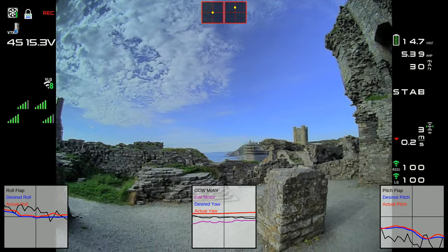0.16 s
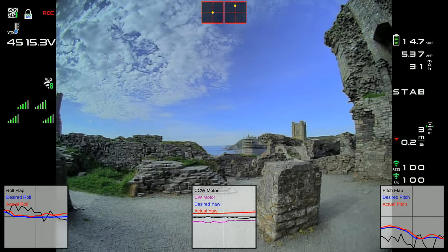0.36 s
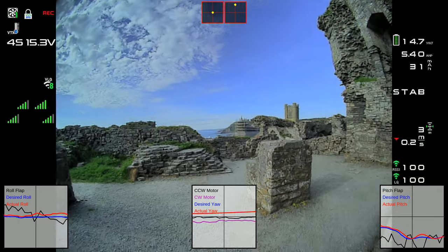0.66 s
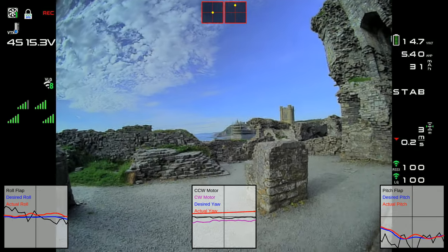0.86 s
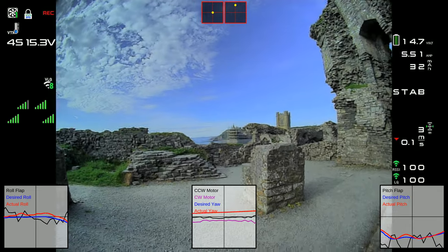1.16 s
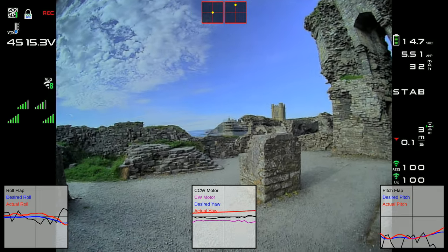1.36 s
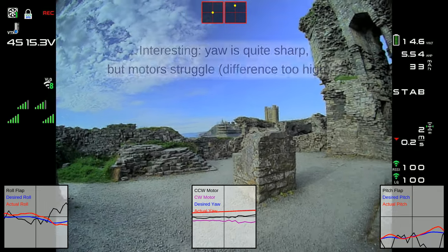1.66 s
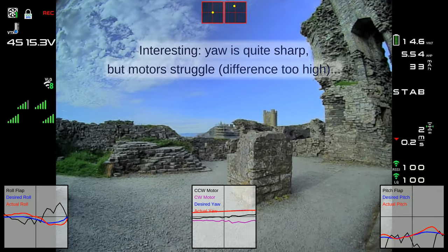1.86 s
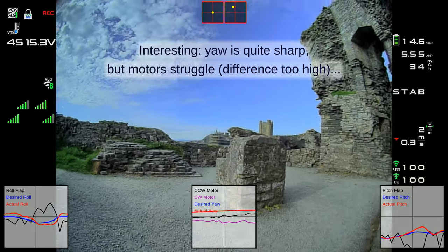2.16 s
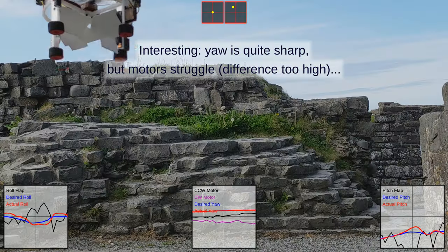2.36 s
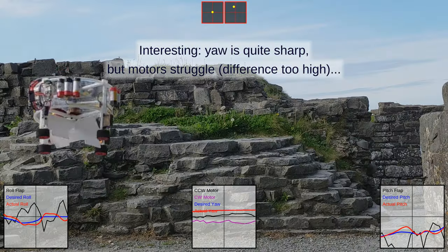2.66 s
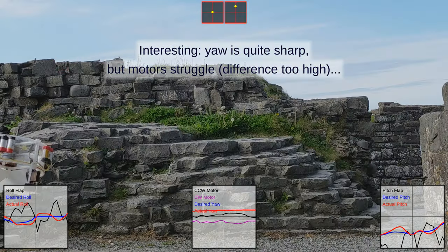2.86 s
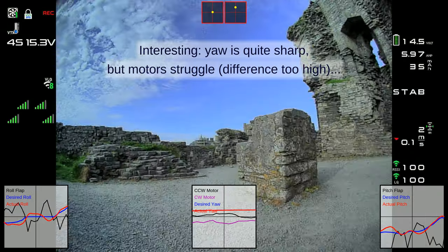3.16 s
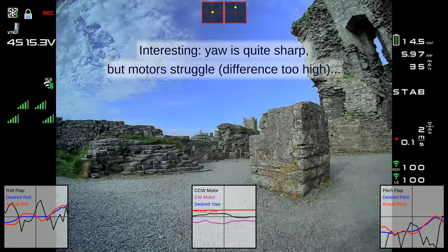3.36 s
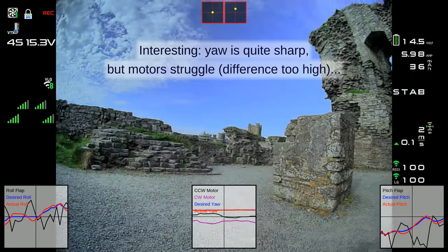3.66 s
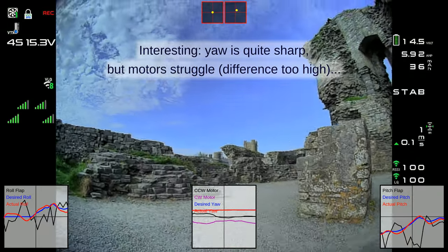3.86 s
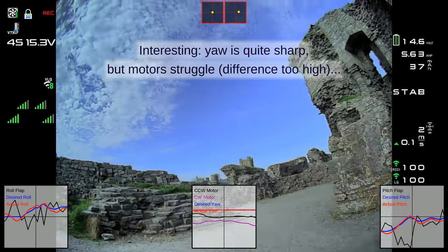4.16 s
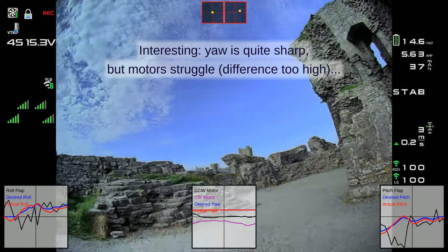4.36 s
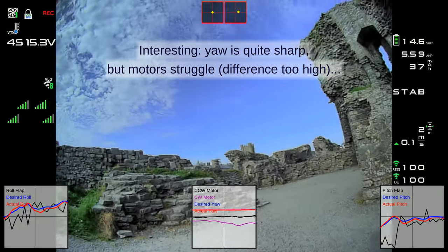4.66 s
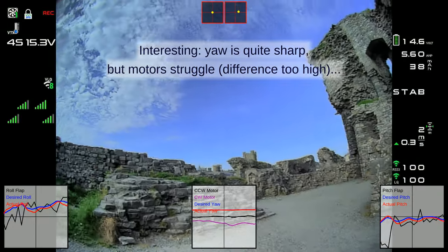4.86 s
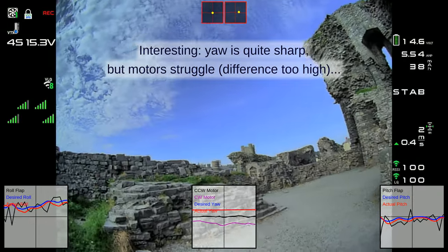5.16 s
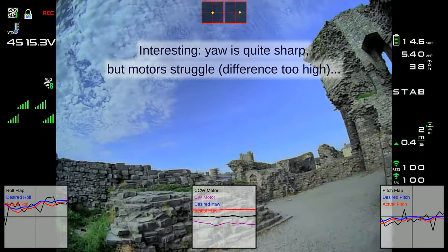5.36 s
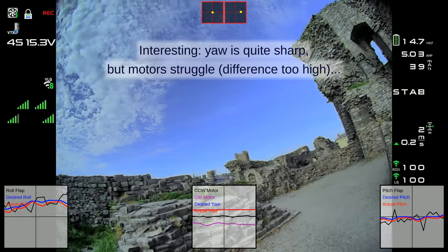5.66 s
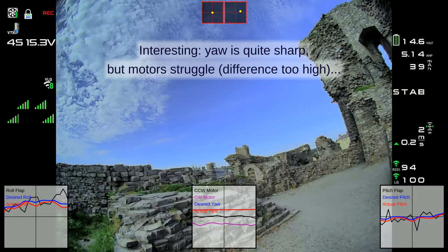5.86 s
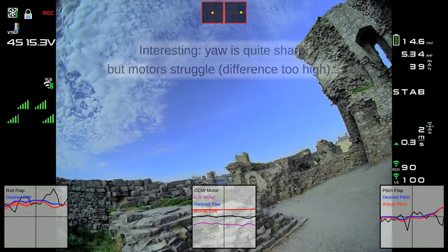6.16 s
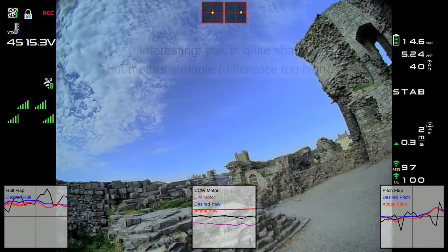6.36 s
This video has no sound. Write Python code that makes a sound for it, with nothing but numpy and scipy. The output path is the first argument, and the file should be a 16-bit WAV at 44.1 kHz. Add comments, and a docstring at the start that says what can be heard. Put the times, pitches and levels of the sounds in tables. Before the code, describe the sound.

From 0 s a small electric copter is already hovering close by in the open among stone walls. Two counter-turning rotors give a dense, rough, buzzing whine, mid-pitched with strong higher tones, fluttering and beating as their slightly different speeds drift. Bright blade hiss rides above, subtly hollow from a short stone echo. Low, soft wind puffs bump the mono microphone during the first second. From 0.6 to 2 s a higher motor whine stands out. At about 2 to 3 s broad downwash rushes in and the buzz turns harsher, the pitch edging up near 3 s. From 3 s it weakens; by 4 s the craft is distant, a thin wavering buzz and faint hiss. Around 5.3 s the pitch dips briefly, then recovers and sags slightly. Very faint wind puffs return past 5 s, over a barely audible far rumble, the rotors still running at 6.5 s.

```python
"""Close by among stone ruins a small copter hovers, its two stacked, counter-turning two-blade rotors singing.
Each rotor sounds at its blade rate; lower blades cutting the upper wake sound at sums of both rates.
Blade tips hiss, with a varying echo off a stone face; the downwash is loudest from about 2 to 3 s, then weakens.
By about 4 s the craft has drifted off and is faint. Wind rumbles in puffs, mostly in the first second
and again past 5 s, over a faint distant rumble, all on one mono microphone."""
import sys
import numpy as np
from scipy import signal
from scipy.fft import rfft, irfft, next_fast_len
from scipy.io import wavfile
from scipy.ndimage import uniform_filter1d, map_coordinates

SR = 44100
rng = np.random.default_rng(int(sys.argv[2]) if len(sys.argv) > 2 else 0)


def wav_out(sig):
    """Save sig, one row per channel (or a flat mono array), as 16-bit PCM at SR to the path in sys.argv[1]."""
    wavfile.write(sys.argv[1], SR, np.round(np.clip(np.atleast_2d(sig).T, -1, 1) * 32767).astype(np.int16))


N = 287532

# throttle, the mean blade-passing rate of both rotors: [t/s, f/Hz]
THROTTLE = [(0.0, 482), (0.24, 482), (0.48, 480), (0.84, 489.3), (1.2, 482), (1.61, 491.6), (2.67, 485.9),
            (2.91, 498.5), (3.01, 502), (3.09, 500), (3.23, 491.7), (3.73, 490), (4.02, 480.2), (4.67, 490),
            (4.96, 478.7), (5.18, 475.7), (5.29, 460), (5.35, 460.4), (5.44, 462), (5.61, 478.5),
            (5.76, 485), (5.88, 480.4), (6.11, 470.5), (6.51, 472.3)]
# yaw command, which speeds one rotor up and slows the other by as much: [t/s, f/Hz]
YAW = [(0.0, 48), (0.08, 47.7), (0.19, 32.6), (0.24, 33), (0.35, 32.6), (0.56, 42.5), (0.61, 39.7),
       (0.7, 23.9), (0.76, 22), (0.93, 32.7), (1.06, 20.7), (1.29, 21.2), (1.42, 27.2), (1.52, 23.1),
       (1.63, 28), (1.71, 25.3), (1.84, 40), (2.0, 20.3), (2.09, 33.7), (2.2, 26), (2.28, 48.5), (2.33, 52),
       (2.41, 53), (2.54, 43), (2.65, 52.1), (2.77, 53.6), (2.86, 45.0), (3.03, 43.5), (3.11, 58),
       (3.18, 61), (3.52, 72.5), (3.64, 65.9), (3.86, 32.3), (4.26, 23.6), (4.46, 38), (4.57, 32),
       (4.93, 52.3), (5.09, 47.6), (5.26, 64.5), (5.59, 49.5), (5.74, 46.5), (5.92, 60), (6.06, 55),
       (6.14, 48.6), (6.29, 58.0), (6.51, 63)]
# tone groups at the microphone as the craft tilts and turns, before beaming: [t/s, thrust hum/dB, its octave/dB,
# wake cutting/dB, slow rotor and high mixed tones/dB, motor whine/dB, blade buzz/dB]
GROUP_LEVELS = [(0.0, -35, -30, -22.5, -22, -38, -34), (0.12, -39.5, -32, -21.5, -22.5, -34.5, -30.0),
                (0.28, -45, -29, -22.5, -28, -31, -37.5), (0.45, -39.5, -32, -23, -24.5, -30.0, -29.5),
                (0.62, -48, -32.5, -24.5, -27.5, -22, -27), (0.95, -36, -30, -25.5, -29.5, -26.0, -32.5),
                (1.42, -34.5, -29.5, -27.5, -26.5, -24.0, -29.5),
                (1.95, -37, -24.5, -26, -26.5, -22, -29.5), (2.26, -45, -27, -25.5, -27.5, -32.5, -25.5),
                (2.46, -40, -36, -38, -25.5, -35, -23.5), (2.62, -42, -28, -26.5, -22.0, -35, -25),
                (2.8, -39.5, -21, -23.5, -24, -35.5, -23), (2.95, -45, -32, -25, -30, -38, -23),
                (3.1, -39.5, -39, -35.5, -29.5, -37, -31.5), (3.28, -43.5, -33, -38, -32, -32.5, -33.5),
                (3.56, -35, -33.5, -33.5, -29.5, -41, -33), (3.8, -47.0, -32, -35.5, -34, -40, -37.5),
                (4.1, -48, -49.5, -50, -39, -42.5, -41.5), (4.55, -45.5, -56.0, -51, -43, -39, -40),
                (4.74, -45.0, -40.5, -50, -41.0, -43, -42.5), (5.0, -47.5, -40, -50.5, -38.5, -47.0, -40),
                (5.36, -44.0, -45, -56.0, -40, -41.5, -41.5), (5.7, -44.5, -36.5, -51.5, -41.5, -37.5, -37),
                (6.1, -50.0, -43.0, -59, -40.0, -36, -40), (6.3, -54, -38.5, -53.5, -44, -43, -41.5),
                (6.52, -43.5, -34.0, -54.5, -39.5, -38, -39.5)]
# tones of each group: [multiple of fast blade rate, multiple of slow blade rate];
# a two-blade shaft turns at half its blade rate
HUM = [(.5, 0), (1, 0)]
OCTAVE = [(2, 0)]
WAKE = [(1, 1), (1, 3)]
SLOW_ROTOR = [(0, 1), (0, 2), (0, 3), (0, 4), (0, 5), (2, 2), (2, 3), (3, 3), (3, 4), (4, 3), (5, 4)]
WHINE = [(7, 0), (14, 0)]
BUZZ = [(3, 0), (4, 0), (5, 0), (6, 0)]
SIZZLE = [(k, 0) for k in (8, 9, 10, 11, 12, 13, 15, 16, 17, 18, 19, 20)]
# how each of those tones beams, one row a tone: [level/dB towards side 0, 1, 2, 3, 4]
HUM_BEAM = [(-20, -29, -29.5, -27, -22.5), (-0.5, -2, -1, 1.5, -1)]
OCTAVE_BEAM = [(0, 0, 0, 0, 0)]
WAKE_BEAM = [(-1, -0.0, -2.5, 0.5, -1), (-18, -12, -19, -10, -4.5)]
SLOW_ROTOR_BEAM = [(-22, -19, -16.5, -30, -22.5), (-6.0, -8.5, -14, -9.5, -10.0),
                   (-9.0, -13, -4.5, -9.5, -14.5), (-15.0, -7.5, -14, -4.5, -23),
                   (-12, -14, -13, -17, -18.5), (-7, -14.5, -7, -13, -6.5), (-15, -19, -14.5, -13.0, 0),
                   (-9.5, -13, 0, -11.5, -21), (-24, -8, -24, -15, 2), (-18, -12, -11, -31, 4),
                   (-17, -6.5, -24, -7, -4)]
WHINE_BEAM = [(0, 0, 1.5, 1, -1), (-12, -6, -5, -12, -13)]
BUZZ_BEAM = [(-15, -12.5, -19, -7.5, -33.5), (-2, -11, -7, -5, -18), (-16.0, -10.5, -15.5, -4.5, -0.5),
             (-2.5, -7, -3.5, -5, -5.0)]
SIZZLE_BEAM = [(-6, -19, -9, -15, -3), (-5.5, -12.5, -18, -4.5, -11), (-9.5, -7, -4.5, -8.5, -3),
               (-5.5, -13.5, -9, -10, -15.5), (-8, -5, -11.5, -6, -8.5), (-8, -6, -2.5, -6, -4.5),
               (-25, -17, -13, -9, -22.5), (-22, -14.0, -11, -9, -19.5), (-20, -19.0, -17, -18, -19),
               (-19.0, -11, -27.0, -19.0, -22), (-15, -18, -19, -25.0, -16),
               (-15, -21.0, -27.0, -19.0, -22.0)]
# side of the craft facing the microphone: [t/s, side 0-4]
SIDE_SHOWN = [(.5, 0), (.85, 1.5), (2.05, 1), (2.3, 1.5), (2.9, 3), (3.15, 3), (3.7, 2.5), (4.0, 3.5)]
# the craft is close, then leaves: [t/s, level/dB of the tip hiss in its top band, above 8 kHz]
HISS_LEVEL = [(0, -22.5), (.25, -24), (.45, -22.5), (1.9, -23.5), (2.05, -23), (2.7, -22), (3.0, -26),
              (3.7, -27), (4.0, -32.5), (4.7, -33.5), (5.1, -34.5), (5.45, -36.5), (5.7, -35), (6.52, -36)]
# tip hiss spectrum: [f/Hz, relative level per Hz/dB]
HISS_SPECTRUM = [(900, -46), (1500, -22.5), (2000, -6), (3300, -0.5), (5000, -2), (6900, -0.5),
                 (8000, -2.5), (9300, -1.5), (10400, -6), (11300, -4.5), (11950, -0.5), (12600, -2.5),
                 (14000, -3.5), (15800, -4)]
# echo off the stone: [t/s, extra path/ms, strength 0-1]
STONE = [(0, .32, .15), (.35, .28, 0), (.5, .23, .5), (.8, .27, 0.59), (1.2, .3, .4), (1.7, 0.3, 0.4),
         (2.0, .27, 0.38), (2.2, .15, 0.24), (6.52, 0.16, 0.22)]
# downwash, its level over time: [t/s, level/dB]
WASH_LEVEL = [(0, -35), (.6, -40.5), (.85, -44), (1.9, -46.5), (2.1, -34), (2.5, -32.5), (3.5, -43.5),
              (3.9, -48.5), (4.6, -52.5), (5.8, -54.5), (6.52, -57)]
# downwash spectrum: [f/Hz, relative level per Hz/dB]
WASH_SPECTRUM = [(150, -22.5), (300, -3), (420, -1.5), (570, -7), (640, -4.5), (740, 2), (950, 5.5),
                 (1200, 8), (1400, 7.5), (1650, 1), (2000, 4.5), (4000, -4.5), (8000, -50)]
# puffs of wind on the microphone: [centre t/s, half width/s, peak level/dB]
PUFFS = [(.1, 0.2, -43.5), (.55, 0.16, -47), (.83, 0.056, -49), (1.36, .07, -59), (1.62, .05, -66),
         (2.62, .05, -69), (5.2, 0.13, -65), (5.78, 0.055, -58), (6.0, 0.22, -61), (6.45, 0.098, -62)]
# wind spectrum: [f/Hz, relative level per Hz/dB]
WIND_SPECTRUM = [(20, -23), (45, -13), (80, 2), (130, -7), (250, -8.5), (500, -47)]
# distant rumble spectrum: [f/Hz, relative level per Hz/dB]
DISTANT_SPECTRUM = [(20, -25), (60, -12), (150, 1.5), (300, 6.5), (500, -10), (1000, -30)]

STEP = 32  # samples between values of slow random curves
CURL = .925  # phase lag of a tone per squared order gap, radians
HUNT_HZ = 0.7064  # each speed controller hunts about its set rate by roughly this much
SIZZLE_OVER_HISS_DB, SIZZLE_LOSS = -10.5, 0.77  # sizzle dB = this + loss x hiss level dB
CALM_DB = -75.5  # wind between puffs
TOP_HZ = 15740  # recorder's band limit


def rotor_tones(fast, slow):
    """Blade loading and wake cutting sound at whole and half multiples of the blade rates and their sums."""
    hum, octave, wake, lower, whine, buzz = curves(GROUP_LEVELS)
    sizzle = SIZZLE_OVER_HISS_DB + SIZZLE_LOSS * curves(HISS_LEVEL)[0]
    # level/dB, tones, beams, fade/dB, roughness, blur/knots per s
    groups = [
        (hum, HUM, HUM_BEAM, 1.66, 0.26, 88.9),
        (octave, OCTAVE, OCTAVE_BEAM, 0.7, 0.19, 70.9),
        (wake, WAKE, WAKE_BEAM, 1.0, 0.09, 70),
        (lower, SLOW_ROTOR, SLOW_ROTOR_BEAM, 2.3, 0.28, 90.13),
        (whine, WHINE, WHINE_BEAM, 1.3, 0.16, 199.0),
        (buzz, BUZZ, BUZZ_BEAM, 3.0, 0.38, 179.4),
        (sizzle, SIZZLE, SIZZLE_BEAM, 3.5, 0.65, 259.2),
    ]
    tones = np.zeros(N)
    for level_db, orders, beams, fade_db, rough, blur_rate in groups:
        tones += amp(level_db) * voice(orders, beams, fast, slow, fade_db, rough, blur_rate)
    return tones


def voice(orders, beams, fast, slow, fade_db, rough, blur_rate):
    """Each tone beams and fades its own way; gusty inflow shakes size and phase, blurring its edges."""
    out = np.zeros(N)
    coarse_times = np.minimum(np.arange(0, N + STEP, STEP), N - 1)
    side = curves(SIDE_SHOWN)[0][coarse_times]
    for (m, n), beam_db in zip(orders, beams):
        inflow = 1 + rough * (wobble(blur_rate) + 1j * wobble(blur_rate))
        towards_mic_db = np.interp(side, np.arange(len(beam_db)), beam_db)
        fading_db = fade_db * (1 - wobble(9) ** 2)
        size = amp(towards_mic_db + fading_db) * inflow
        # tones are locked to the blade angles, so neighbours beat deeply; CURL spreads each blade pass in time
        phase = m * fast + n * slow + CURL * (m - n) ** 2
        out += np.sqrt(2) * (fine(size) * np.exp(1j * phase)).imag
    return out


def turns(rate):
    """Blade phase in radians; the rotor's inertia smooths the commanded rate."""
    smooth_rate = uniform_filter1d(rate, size=2000)
    return 2 * np.pi * np.cumsum(smooth_rate + HUNT_HZ * fine(wobble(14))) / SR


def tip_hiss(fast, slow):
    """Turbulence at the blade tips hisses, swelling as each blade sweeps past."""
    sweep = 1 + 0.065 * np.cos(fast) + 0.046 * np.cos(slow)
    # the whole hiss lies 4 dB over its top band
    level_db = curves(HISS_LEVEL)[0] + 4.0 + 0.15 * fine(wobble(11))
    return amp(level_db) * unit(sweep * rush(HISS_SPECTRUM, patchy_db=1.63))


def stone(x, dull_hz):
    """x and its short echo, which combs the spectrum; rough stone scatters the treble away."""
    delay_ms, strength = curves(STONE)
    dull = filtered(x, lambda hz: 1 / (1 + (hz / dull_hz) ** 6))
    echo = map_coordinates(dull, [np.arange(N) - delay_ms * SR / 1000], mode="nearest")
    return x + strength * echo


def downwash():
    """Air driven down by the rotors roars softly and unevenly."""
    return amp(curves(WASH_LEVEL)[0]) * rush(WASH_SPECTRUM, patchy_db=2.5)


def wind():
    """Air pressing on the microphone rumbles in lumps, low in frequency."""
    puffs = amp(CALM_DB) + sum(amp(db) * bump(s, width_s) for s, width_s, db in PUFFS)
    lumps = amp(4.2 * fine(wobble(16)))
    return puffs * unit(lumps * rush(WIND_SPECTRUM, patchy_db=3.8))


def distant_rumble():
    """A faint, steady rumble from far off, as shaped noise."""
    return amp(-68.5) * rush(DISTANT_SPECTRUM, patchy_db=0.5)


def rush(spectrum, patchy_db):
    """Noise of rms 1 shaped by a spectrum, with time-frequency patches of random gain."""
    z = signal.stft(rng.standard_normal(N), nperseg=512)[2]
    field = uniform_filter1d(rng.standard_normal(z.shape), 6, axis=0)
    field = uniform_filter1d(field, 14, axis=1)
    noise = signal.istft(z * amp(patchy_db * unit(field)), nperseg=512)[1][:N]
    hz, db = np.transpose(spectrum)
    # levels run straight over log frequency
    return unit(filtered(noise, lambda f: amp(np.interp(np.log(f + 1), np.log(hz), db))))


def filtered(x, response):
    """x times a response of frequency, without phase shift."""
    m = next_fast_len(N + 8192)
    return irfft(rfft(x, m) * response(np.fft.rfftfreq(m, 1 / SR)), m)[..., :N]


def wobble(rate):
    """A smooth random curve, rate knots a second, one value every STEP samples."""
    knots = rng.standard_normal(int(N * rate / SR) + 4)
    return map_coordinates(knots, [np.arange(0, N + STEP, STEP) * rate / SR])


def fine(coarse):
    """One value per sample from one every STEP samples."""
    return np.interp(np.arange(N) / STEP, np.arange(len(coarse)), coarse)


def curves(rows):
    """One value per sample for each column after the time."""
    s, *cols = np.transpose(rows)
    return [np.interp(np.arange(N) / SR, s, c) for c in cols]


def bump(s, width_s):
    """A bell of height 1 around time s, down to 1/e at width_s either side."""
    return np.exp(-((np.arange(N) / SR - s) / width_s) ** 2)


def amp(db):
    """Decibels to gain."""
    return 10 ** (np.asarray(db) / 20)


def unit(x):
    """x at rms 1."""
    return x / np.sqrt(np.mean(np.abs(x) ** 2) + 1e-20)


def scene():
    """Copter, echo and air at one microphone, which feeds both channels."""
    throttle, yaw = curves(THROTTLE)[0], curves(YAW)[0]
    fast, slow = turns(throttle + yaw), turns(throttle - yaw)
    copter = rotor_tones(fast, slow) + stone(tip_hiss(fast, slow), dull_hz=8500)
    mono = copter + downwash() + wind() + distant_rumble()
    return np.tile(mono, (2, 1))


def record(dry):
    """The recorder keeps nothing above its band limit."""
    return filtered(dry, lambda hz: hz < TOP_HZ)


dry = scene()
out = record(dry)
wav_out(out)
```